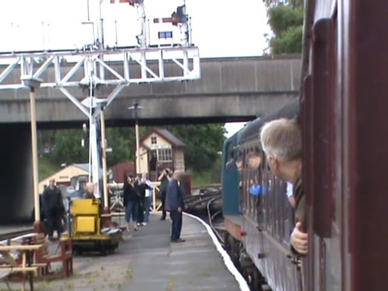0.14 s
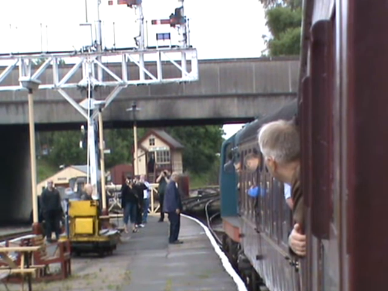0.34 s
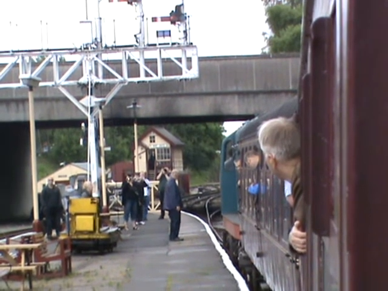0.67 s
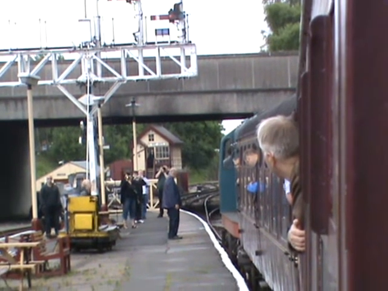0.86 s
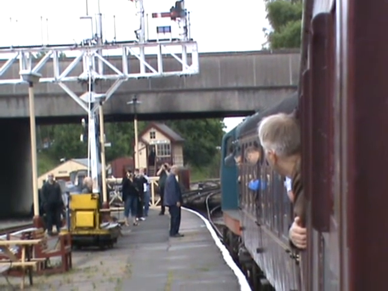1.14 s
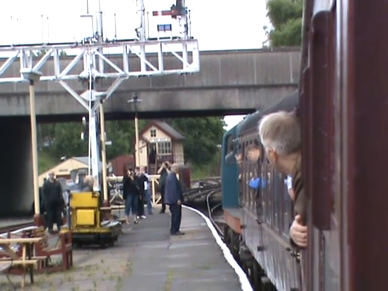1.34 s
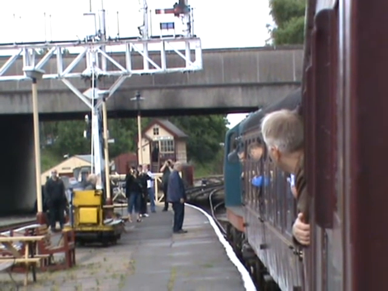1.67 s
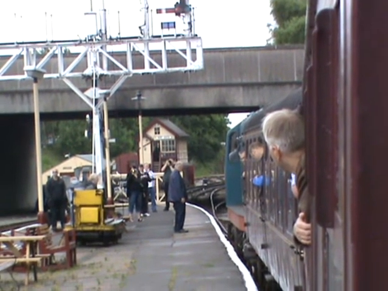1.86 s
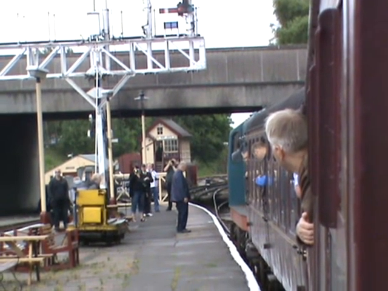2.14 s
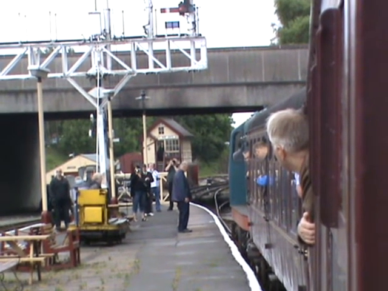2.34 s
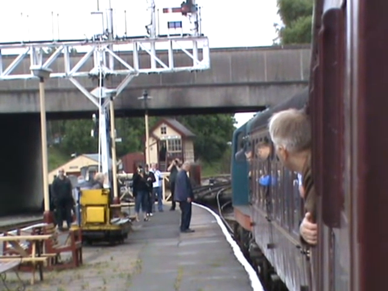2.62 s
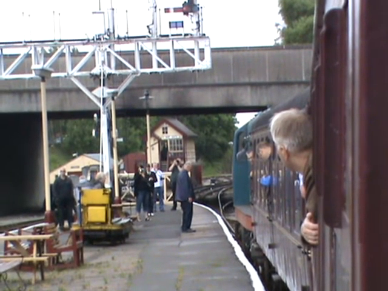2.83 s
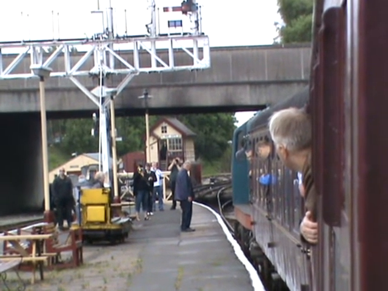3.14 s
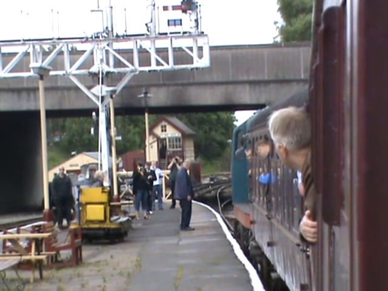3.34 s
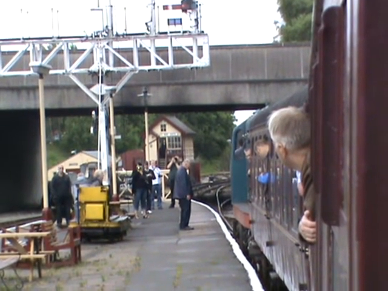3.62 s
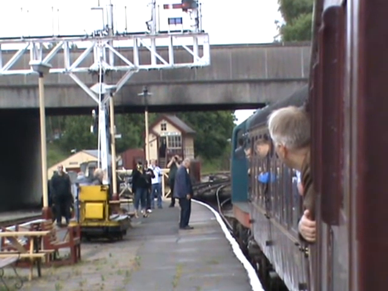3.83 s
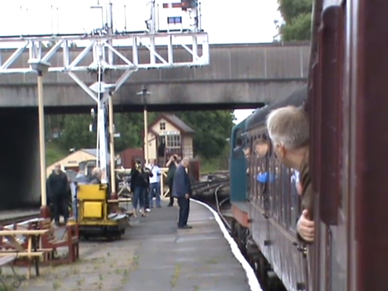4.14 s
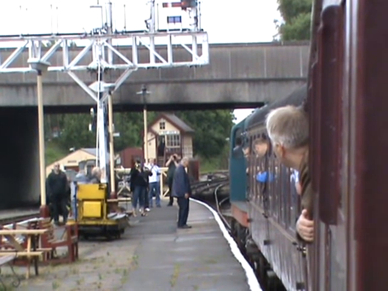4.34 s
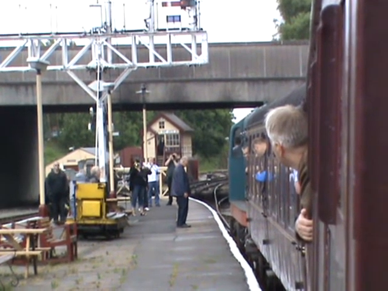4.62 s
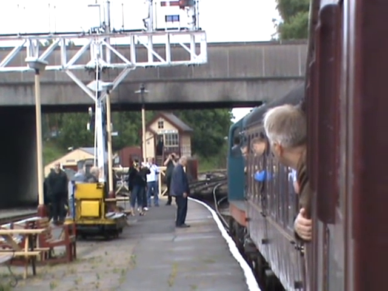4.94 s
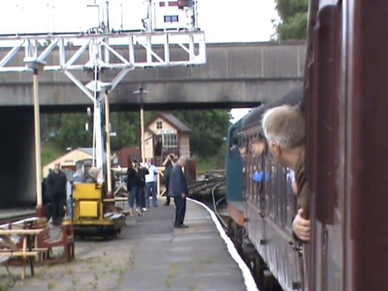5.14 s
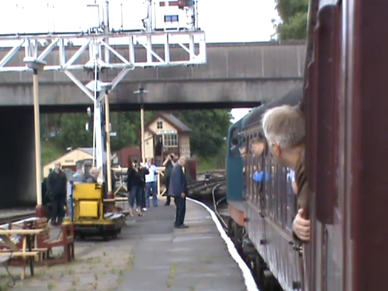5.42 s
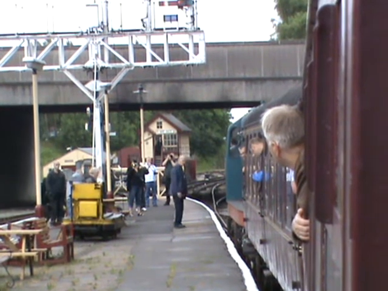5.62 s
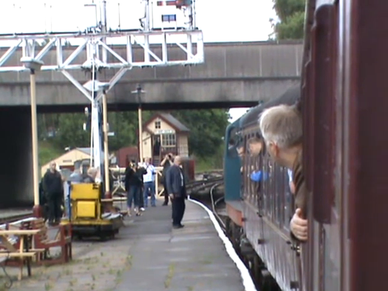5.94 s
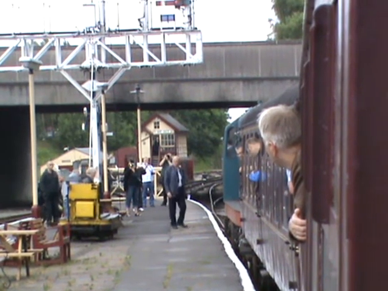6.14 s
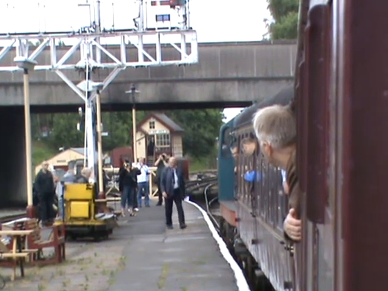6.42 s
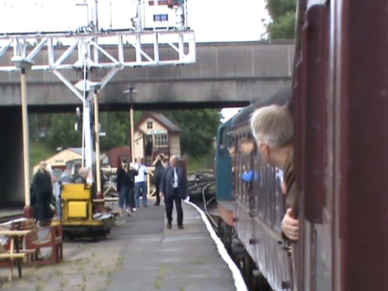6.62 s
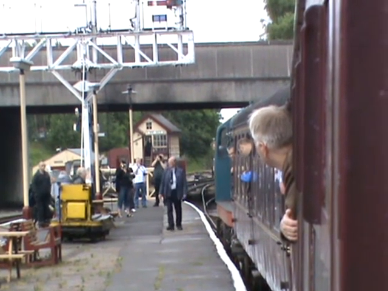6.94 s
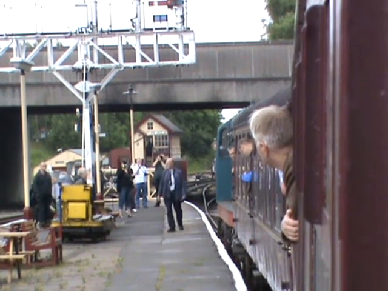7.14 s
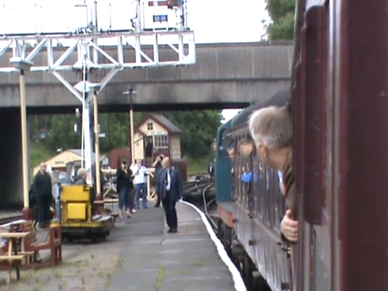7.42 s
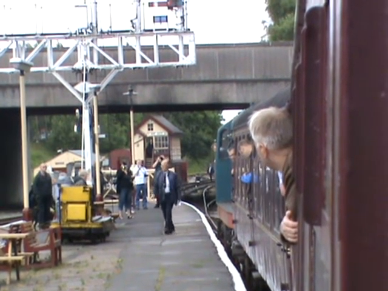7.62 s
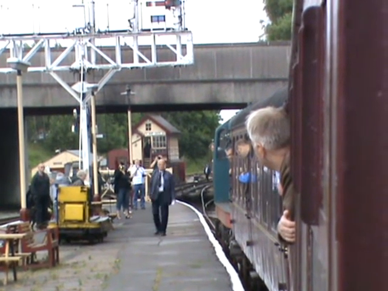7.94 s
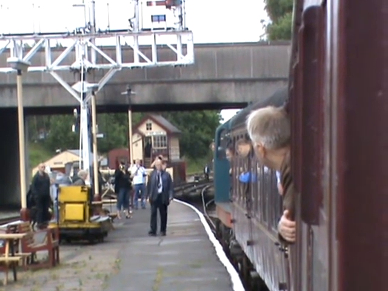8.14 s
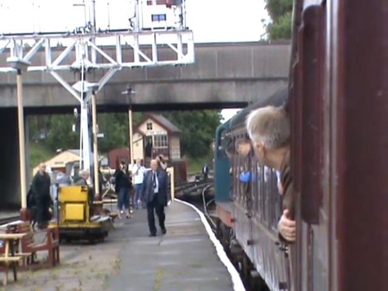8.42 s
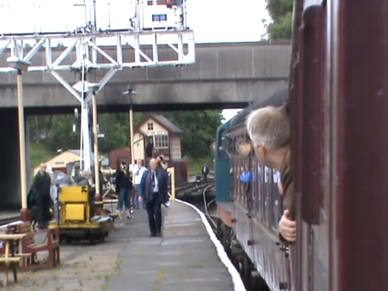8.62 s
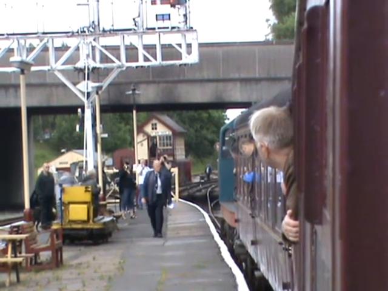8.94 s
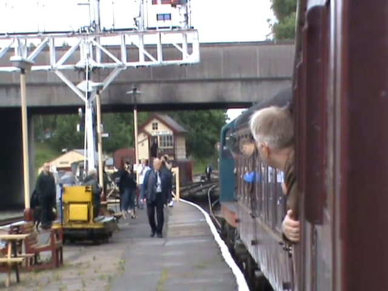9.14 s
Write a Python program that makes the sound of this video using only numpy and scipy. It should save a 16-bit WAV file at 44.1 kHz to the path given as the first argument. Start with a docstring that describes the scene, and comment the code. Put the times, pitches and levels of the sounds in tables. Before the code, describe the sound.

A big four-stroke diesel locomotive stands at an outdoor platform throughout, never pulling away. A low, dense body roar runs steadily with faint wavering hums and a soft whine near 375 hertz. Over it, a piercing turbo whistle around 2.35 to 2.5 kilohertz is chopped into a fast, uneven warble of almost thirty puffs a second; a fainter second whistle sits just above. At 0.8 s a light triple clack sounds with a tiny puff of air. Load rises from 2.4 s, peaking around 3 to 3.4 with stronger hiss; a sharp tick falls at 3.2. It drops back by 3.7 as a dull, clustered thump lands. Another surge spans 5.2 to 5.8, then eases from 6.2 to 7. From 7.5 to the end at about 9.3 the hiss swells most, pitch creeping up, with faint sheet-metal rings about every eighth of a second after 8. Close stereo microphone, very short reflections.

```python
"""Whistling, chopped by exhaust puffs over a low rumble: a big four-stroke diesel locomotive stands along a platform.
Its speed hunts and its load surges. The puffs swell the blade tones of two turbochargers and spurt filtered noise.
Ringing resonators make a sheet-metal panel, and clicks with noise bursts make a few carriage knocks.
A whine follows the engine speed among steady hums. Two close microphone ports colour left and right by pitch."""
import sys
import numpy as np
from scipy import signal
from scipy.fft import rfft, irfft, next_fast_len
from scipy.io import wavfile
from scipy.ndimage import uniform_filter1d

SR = 44100
rng = np.random.default_rng(int(sys.argv[2]) if len(sys.argv) > 2 else 0)


def master(y):
    """Save y as 16-bit WAV."""
    cut = np.clip(np.atleast_2d(y).T, -1, 1)
    pcm = np.round(cut * 32767)  # scale
    wavfile.write(sys.argv[1], SR, pcm.astype(np.int16))


N = 409248
TIME = np.arange(N) / SR

# Roar of the engine body. Each row: frequency in Hz, relative density in dB per Hz.
ROAR_SPECTRUM = [(20, -22), (55, -8), (110, -3), (190, -2), (290, 3.5), (365, -2), (430, -7.5), (540, -1.5),
                 (640, -7), (730, -7.5), (950, -11.5), (1400, -16.5), (2200, -26), (16000, -99)]
# Steady self-noise of the microphone. Each row: frequency in Hz, relative density in dB per Hz.
MIC_NOISE_SPECTRUM = [(3000, 0), (8000, -3.5), (11000, -6.5), (13000, -9.5), (16000, -13)]
# Steady-pitched hums. Each row: frequency in Hz, mean level in dB rms, spread of the pitch waver in Hz.
HUM_TONES = [(97, -36, 5), (397, -46, 1), (484, -47, 4), (716, -47, 16), (871, -48, 3), (2868, -55.5, 9),
             (15625, -84, .6)]
# Exhaust beat. Each row: multiple of the cycle rate, mean level in dB rms.
FIRING_ORDERS = [(12, -49), (16, -42), (32, -39.5)]
# Resonances of three struck carriage parts. Each row: frequency in Hz, relative level in dB, width in Hz.
LATCH_MODES = [(1340, -6, 120), (1850, -9, 350), (2680, -15, 250), (900, -13, 300)]
DOOR_MODES = [(405, -6, 40), (860, -13, 55), (470, -13, 45), (740, -15, 60), (545, -15, 55)]
PIN_MODES = [(4600, -9, 2500), (7500, -19, 3000), (11600, -10, 3400)]
# Touches on those parts. Each row: time in seconds, relative strength in dB.
LATCH_HITS = [(.8222, 0), (.829, -4), (.836, -3)]
DOOR_HITS = [(3.7315, -3.5), (3.7445, -9), (3.754, -8), (3.762, -7)]
PIN_HITS = [(3.183, 0)]
# Short breaths of air. Each row: centre in seconds, length scale in seconds, gain of the band noise in dB,
# low edge in Hz, high edge in Hz.
AIR_BREATHS = [(.862, .013, -25, 2900, 4300), (.888, .035, -50, 9000, 14000)]
# Sheet-metal resonances. Each row: frequency in Hz, relative level in dB, 60 dB decay time in seconds.
PANEL_MODES = [(1379.5, -3.5, 0.065), (3750, -14, 0.045), (1235, -9, 0.043), (3119, -15, .025),
               (5060, -19, .04)]
# Pushes on the panel. Each row: centre in seconds, relative strength in dB.
PANEL_PUSHES = [(5.136, -36), (5.4116, -28.5), (5.6708, -29), (6.4843, -31.5), (6.9007, -37), (7.319, -29),
                (7.448, -25), (7.5877, -30), (8.127, -21.5), (8.25, -30), (8.399, -26), (8.5432, -21.5),
                (8.6713, -24.5), (8.808, -27), (8.9397, -22.5), (9.084, -25.5), (9.2177, -25)]
# Exhaust gas noise. Each row: frequency in Hz, relative density in dB per Hz.
HISS_SPECTRUM = [(700, -48), (1300, 1.5), (2000, -4), (2400, 5.5), (3000, -1.5), (4000, -9), (4900, -10),
                 (5600, -17), (6400, -18.5), (7300, -16), (9000, -21.5), (11000, -30), (16000, -56)]
# Engine speed before smoothing, hunting about its set value. Each row: time in seconds, speed in cycles per second.
SPEED_CURVE = [(0, 3.722), (.506, 3.75), (2.148, 3.578), (3.636, 3.776), (4.674, 3.601), (6.153, 3.751),
               (7.33, 3.631), (8.297, 3.686), (9.28, 3.649)]
# Load comes and goes as the speed hunts. Each row: time in seconds, load from 0 to 1,
# near whistle level in dB, level of its third harmonic in dB (both levels before the puffs swell them).
ENGINE_CURVE = [(0, 0.14, -19, -48), (.8, .2, -20, -46.5), (1.5, .14, -20.5, -52), (2.0, 0.24, -21, -61),
                (2.4, .45, -19.5, -52), (3.0, 0.84, -22, -51), (3.4, 0.77, -22, -49),
                (3.7, 0.13, -25.5, -61), (4.2, .18, -22.5, -46), (4.7, 0.27, -22, -62),
                (5.2, 0.62, -21, -64), (5.8, .7, -22.5, -65), (6.2, 0.29, -21.5, -60),
                (7.0, 0.29, -22, -51), (7.6, .8, -20.5, -50), (8.1, 0.99, -21.5, -62),
                (9.28, 0.92, -23.5, -58)]
# Puffs into the far turbo. Each row: place in the cycle from 0 to 1, length scale in cycles, whistle swell in dB.
FAR_TURBO_PUFFS = [(.08, 0.042, -4), (.22, 0.023, -5.5), (.35, 0.027, 2), (.48, 0.031, -16),
                   (.57, 0.016, -5.5), (.71, 0.03, -0.5), (.825, 0.067, -6), (.98, 0.059, -4)]
# Puffs into the near turbo. Each row: place in the cycle from 0 to 1, length scale of the whistle swell in cycles,
# swell in dB of whistle, third harmonic and hiss, gain of the whistle swell at full load in dB.
NEAR_TURBO_PUFFS = [(0.031, 0.027, -1.5, 2.5, 6.5, -6.5), (0.129, 0.036, -8, -18, -4, 6.5),
                    (0.285, 0.045, 2, 1.5, -4, -2), (0.382, 0.015, -1.5, -2, 8, 1),
                    (0.533, 0.032, -1.5, 2.5, 4.5, -2), (0.631, 0.031, -6, -9, -6, 9),
                    (0.791, 0.04, 2, 0.5, 1.5, -3), (0.872, 0.015, -11.5, -11, -7, 11),
                    (0.459, 0.0083, -6, -14, -47, 0.5), (.96, 0.048, -20, -14, -28, 3)]
# Microphone ports. Each row: frequency in Hz, left minus right in dB, left lead in radians, likeness from 0 to 1.
PORT_COLOUR = [(40, 1, -0.45, 0.46), (130, -1, -0.46, 1), (305, -6, -1.04, 0.98), (433, -7, -0.74, 0.46),
               (607, -7.5, -0.14, 0.83), (774, -11.5, -0.67, 0.13), (796, -12, 1.05, 0.67),
               (980, -7.5, 1.94, 0.83), (1270, -2, 1.5, 0.98), (1910, -2, 0.92, 0.19),
               (2295, -0.8, 1.11, 1), (2870, 1.5, 0.82, 0.8), (4750, -1.5, 0.1, 0.29),
               (6170, -1, 0.26, 0.34), (7150, 2.3, 0.58, 0.6), (10600, 0.5, .01, .93),
               (16000, -1.3, .01, .99)]

ROAR_DB = -23.5
# The whine swells with load, and where its pitch meets the casing resonance.
WHINE_ORDER, WHINE_DB, WHINE_LOAD_DB = 102.03, -45.5, 4   # times the cycle rate; unloaded; gain at full load
CASING_HZ, CASING_WIDTH_HZ, CASING_DB = 369, 3.2, 11
LATCH_T60_S, DOOR_T60_S, PIN_T60_S = 0.038, 0.041, .03   # decay of the noise burst in each touch
FLYWHEEL_S, START_CYCLE = .51, -.058   # span that rounds the speed swings; crank place at the start
# Whistle pitches: Hz at the start, Hz it settles to unloaded, Hz it settles to at full load, lag in seconds.
NEAR_ROTOR, FAR_ROTOR = (2374, 2336, 2608, 2.8), (2427, 2410, 2760, 3.2)
FAR_IDLE_DB, FAR_LOAD_DB = -33.5, 1.5   # far whistle unloaded before its swell; gain at full load
CUTOFF_HZ = 16150


def amp(db):
    """Decibels to gain."""
    return 10 ** (np.asarray(db) / 20)


def columns(rows, at):
    """Each column after the first, read at the given places along the first."""
    first, *rest = np.transpose(rows)
    return [np.interp(at, first, column) for column in rest]


def highpass_or_band(x, edges_hz, kind):
    """Second-order Butterworth filter."""
    return signal.sosfilt(signal.butter(2, edges_hz, kind, fs=SR, output="sos"), x)


def drift(rate):
    """Slow random wander of spread 1: noise through two one-pole low-passes at rate Hz."""
    step = 40   # samples between the wander's own points
    pole = np.exp(-2 * np.pi * step * rate / SR)
    noise = rng.standard_normal(N // step + 2002)
    slow = signal.lfilter([1], [1, -2 * pole, pole * pole], noise)[2000:]   # drop the run-in
    return np.interp(np.arange(N) / step, np.arange(len(slow)), slow / slow.std())


def tone(hz, waver_hz, rate, bend=0):
    """A sine of rms 1 whose pitch wavers; bend shifts its phase, in turns."""
    turns = np.cumsum(hz + waver_hz * drift(rate)) / SR
    return np.sqrt(2) * np.sin(2 * np.pi * (turns + bend + rng.random()))


def coloured(gate, spectrum):
    """Three unrelated draws of gated noise with one spectrum: direct, scattered left, scattered right."""
    size = next_fast_len(N)
    hz = np.arange(1, size // 2 + 2) * SR / size
    spectrum_hz, spectrum_db = np.transpose(spectrum)
    gain = amp(np.interp(np.log(hz), np.log(spectrum_hz), spectrum_db))
    gain = gain / np.sqrt(np.mean(gain ** 2))   # the colour leaves the loudness alone
    noise = gate * rng.standard_normal((3, N))
    return irfft(rfft(noise, size) * gain, size)[:, :N]


def resonance(x, hz, t60):
    """A damped resonator: a unit click sets a sine of starting height 1 ringing."""
    radius, angle = amp(-60 / (t60 * SR)), 2 * np.pi * hz / SR
    poles = [1, -2 * radius * np.cos(angle), radius * radius]
    return signal.lfilter([0, np.sin(angle)], poles, x + 1e-18)


def puffs(cycle, places, lengths, levels_db, spread_db, rise=0.78, fall=1.16):
    """Pressure pulses at fixed places in the cycle, unlike in rise and fall, each varying in level every round."""
    out = np.zeros(N)
    for place, length, level_db in zip(places, lengths, levels_db):
        nearest = np.round(cycle - place)
        luck = np.clip(rng.standard_normal(64), -2, 1.5)[nearest.astype(int) + 2]
        past = (cycle - place - nearest) / length - .15   # the peak falls slightly after the place
        steepness = np.where(past > 0, fall, rise)
        out += amp(level_db + spread_db * luck) * np.exp(-(past * steepness) ** 2)
    return out


def rumble():
    """Engine body and exhaust roar: low noise of slightly unsteady level, over the microphone's steady faint hiss."""
    roar = coloured(amp(ROAR_DB + 0.42 * drift(7)), ROAR_SPECTRUM)
    return roar + amp(-55) * coloured(1, MIC_NOISE_SPECTRUM)


def drones(cycle, speed, load):
    """Wavering hums, firing orders locked to the crank, and a whine that a casing resonance lifts."""
    out = np.zeros(N)
    for hz, db, waver_hz in HUM_TONES:
        out += amp(db + 2 * drift(1.5)) * tone(hz, waver_hz, rate=5.95)
    for multiple, db in FIRING_ORDERS:
        phase = 2 * np.pi * multiple * cycle + .8 * drift(3)
        out += amp(db + 2 * drift(3)) * np.sqrt(2) * np.sin(phase)
    whine_hz = WHINE_ORDER * speed
    casing_db = CASING_DB * np.exp(-((whine_hz - CASING_HZ) / CASING_WIDTH_HZ) ** 2)
    whine_db = WHINE_DB + WHINE_LOAD_DB * load + casing_db
    return out + amp(whine_db + 1.3 * drift(6.5)) * tone(whine_hz, waver_hz=.8, rate=3.8)


def struck(modes, touches, t60):
    """Each touch is a click and a dying burst of noise in the broad resonances of the part."""
    out, after = np.zeros(N), TIME[:SR // 5]
    for s, strength_db in touches:
        burst = .05 * rng.standard_normal(len(after)) * amp(-60 * after / t60)
        burst[0] = 1
        for k, (hz, db, width_hz) in enumerate(modes):
            contact = np.hanning(round(SR / hz / 2) + 3)   # a soft contact spares the treble
            soft = np.convolve(burst, contact / contact.sum())[:len(after)]
            ring = resonance(soft, hz, t60=np.log(1000) / (np.pi * width_hz))
            out[round(s * SR):][:len(after)] += (-1) ** k * amp(strength_db + db) * ring
    return out


def knocks():
    """A clack, a tick and a thump from struck parts, thin in the bass, and short breaths of band noise."""
    out = struck(LATCH_MODES, LATCH_HITS, LATCH_T60_S)
    out += struck(PIN_MODES, PIN_HITS, PIN_T60_S)
    out += struck(DOOR_MODES, DOOR_HITS, DOOR_T60_S)
    out = highpass_or_band(out, 280, "high")
    for s, length, db, low_hz, high_hz in AIR_BREATHS:
        air = highpass_or_band(rng.standard_normal(N), [low_hz, high_hz], "band")
        out += amp(db) * air * np.exp(-((TIME - s) / length) ** 2)
    return out


def panel():
    """Sheet metal rings in its resonances after pushes that each swell and fade over 16 ms."""
    push, out = np.hanning(round(.016 * SR)), np.zeros(N)
    for hz, db, t60 in PANEL_MODES:
        drive = np.zeros(N + len(push))
        for s, strength_db in PANEL_PUSHES:
            at = round(s * SR) - len(push) // 2
            shake_hz = hz * rng.normal(1, 0.037)   # each push shakes slightly off the resonance
            shake = np.sin(2 * np.pi * (shake_hz * TIME[:len(push)] + rng.random()))
            drive[at:at + len(push)] = amp(strength_db + db + rng.normal(0, 2.2)) * push * shake
        out += resonance(drive[:N], hz, t60) * amp(-34.5)
    return out


def exhaust_hiss(cycle, load):
    """Gas noise: a rush that grows with load, and spurts on the puffs whose balance shifts with load."""
    place, length, _, _, hiss_db, load_db = np.transpose(NEAR_TURBO_PUFFS)
    levels_db = [db + 1.22 * gain_db * load for db, gain_db in zip(hiss_db, load_db)]
    spurts = puffs(cycle, place, 1.13 * length, levels_db, spread_db=4.0, rise=0.93, fall=0.87)
    gate = amp(3.06 * load) * (1 + amp(-13.5 + 5.0 * load) * spurts)
    return amp(-38) * coloured(gate, HISS_SPECTRUM)


def rotor(load, start_hz, idle_hz, full_hz, lag_s):
    """A heavy wheel creeps towards the pitch that the load asks for."""
    keep = np.exp(-1 / (lag_s * SR))
    target_hz = idle_hz + (full_hz - idle_hz) * load
    return start_hz + signal.lfilter([1 - keep], [1, -keep], target_hz - start_hz)


def whistle(hz, swell, floor_db, waver_hz):
    """A blade tone: sharp while a puff builds, flat while it dies."""
    level = swell + amp(floor_db)   # the tone never quite stops between puffs
    return level * tone(hz, waver_hz, rate=60, bend=.19 * np.log(level))


def turbos(cycle, load, near_db, third_db):
    """Two turbines' blade tones that swell with every puff; the near one adds second and third harmonics."""
    near_hz, far_hz = rotor(load, *NEAR_ROTOR), rotor(load, *FAR_ROTOR)
    place, length, whistle_db, harmonic_db, _, load_db = np.transpose(NEAR_TURBO_PUFFS)
    levels_db = [db + gain_db * load for db, gain_db in zip(whistle_db, load_db)]
    swell = puffs(cycle, place, length, levels_db, spread_db=1.86)
    near = amp(near_db) * whistle(near_hz, swell, floor_db=-21, waver_hz=9.77)
    second = amp(near_db - 32) * swell * tone(2 * near_hz, waver_hz=88.5, rate=60)
    third_swell = puffs(cycle, place, 0.61 * length, harmonic_db, spread_db=1.5)
    third = amp(third_db) * third_swell * tone(3 * near_hz, waver_hz=30, rate=58.5)
    far_swell = puffs(cycle, *np.transpose(FAR_TURBO_PUFFS), spread_db=0.2)
    far_gain = amp(FAR_IDLE_DB + FAR_LOAD_DB * load)
    far = far_gain * whistle(far_hz, far_swell, floor_db=-9.5, waver_hz=18.84)
    return near + second + third + far


def with_echoes(direct):
    """The sound itself and two scattered copies thrown back by train side and bridge, as decaying noise tails."""
    echoes = rng.standard_normal((2, SR // 2)) * amp(-60 * TIME[:SR // 2] / 0.11)   # 60 dB down in 0.11 s
    echoes /= np.sqrt(np.sum(echoes ** 2, axis=1, keepdims=True))
    scattered = signal.fftconvolve(direct[None], echoes, axes=1)[:, :N]
    return np.vstack([direct, scattered])


def ports(arrivals):
    """Left and right differ in level and phase by pitch; the scattered share makes them unlike."""
    size = next_fast_len(N + 2048)
    hz = np.arange(1, size // 2 + 2) * SR / size
    log_rows = [(np.log(port_hz), *rest) for port_hz, *rest in PORT_COLOUR]
    balance_db, lead, alike = columns(log_rows, np.log(hz))
    alike = np.clip(alike, 0, 1)
    left = amp(balance_db / 2) * np.exp(.5j * lead)
    right = amp(-balance_db / 2) * np.exp(-.5j * lead)
    pair = np.array([left, right])
    # hold the loudness of the left-right average steady across pitch
    shared_power = alike * abs(pair.mean(axis=0)) ** 2
    scattered_power = (1 - alike) * np.sum(abs(pair) ** 2, axis=0) / 4
    pair /= np.sqrt(shared_power + scattered_power)
    waves = rfft(arrivals, size)
    mixed = np.sqrt(alike) * waves[0] + np.sqrt(1 - alike) * waves[1:]
    return irfft(pair * mixed, size)[:, :N]


def scene():
    """One crank cycle and one load curve steer the engine layers; panel and knocks keep their own times."""
    raw_speed = columns(SPEED_CURVE, TIME)[0]
    speed = uniform_filter1d(raw_speed, size=round(FLYWHEEL_S * SR), mode="nearest")
    cycle = START_CYCLE + np.cumsum(speed) / SR
    load, near_db, third_db = columns(ENGINE_CURVE, TIME)
    background = rumble() + drones(cycle, speed, load)   # drones reach all three arrivals alike
    echoed = with_echoes(knocks() + panel() + turbos(cycle, load, near_db, third_db))
    return ports(background + exhaust_hiss(cycle, load) + echoed)


def record(dry):
    """A steep low-pass cuts the top."""
    return signal.sosfilt(signal.cheby2(20, 60, CUTOFF_HZ, fs=SR, output="sos"), dry)


dry = scene()
out = record(dry)
master(out)
```